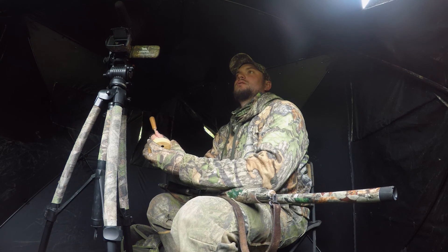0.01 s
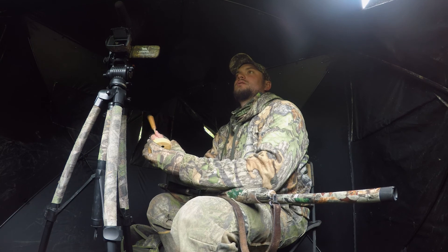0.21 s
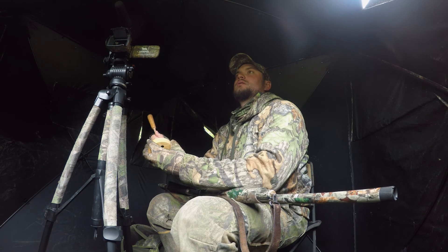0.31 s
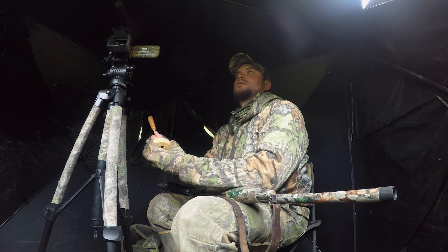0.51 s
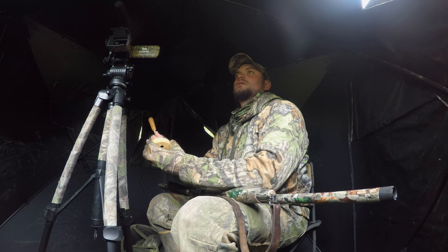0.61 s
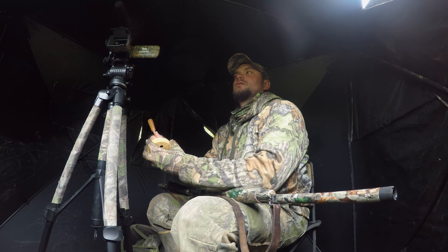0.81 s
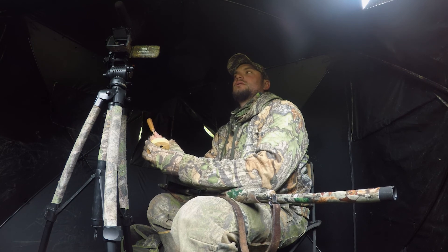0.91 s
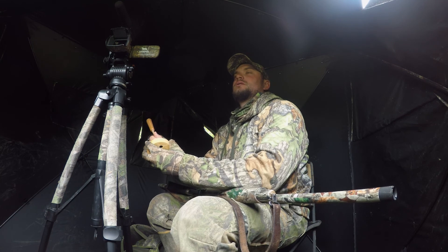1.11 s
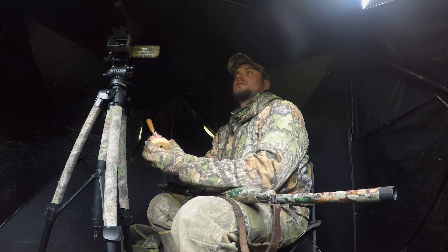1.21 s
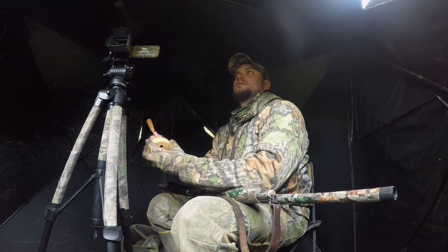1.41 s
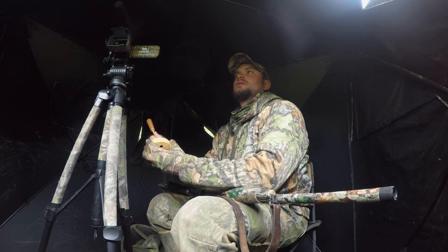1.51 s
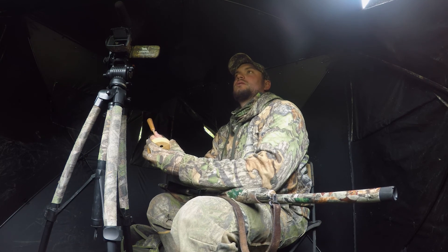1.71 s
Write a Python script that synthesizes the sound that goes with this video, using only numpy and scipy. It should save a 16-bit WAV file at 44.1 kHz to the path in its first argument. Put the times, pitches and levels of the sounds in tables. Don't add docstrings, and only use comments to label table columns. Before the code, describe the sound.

A wooden striker catches on a slate pot call, giving one very short, bright, hollow cluck. Close microphone in a small cloth blind; faint woods echo, soft road rumble, hiss and tiny cloth rustles continue.

```python
import sys
import numpy as np
from scipy import signal
from scipy.fft import rfft, irfft
from scipy.io import wavfile
from scipy.ndimage import uniform_filter1d

SR = 44100
rng = np.random.default_rng(int(sys.argv[2]) if len(sys.argv) > 2 else 0)


def pcm_store(signal):
    levels = np.round(np.clip(np.atleast_2d(signal), -1, 1) * 32767)
    wavfile.write(sys.argv[1], SR, levels.astype(np.int16).T)


def gain_from_decibels(decibels):
    exponent = np.asarray(decibels, float) / 20
    return 10 ** exponent


N = 77175

# f/Hz, level/dB per Hz
AIR_SPECTRUM = [(76, -34), (130, -4.5), (193, -4), (271, -11), (650, -12.5), (793, -14.5), (4200, -35.5),
                (9490, -34), (15000, -46.5)]
# f/Hz, correlation/1
AIR_LIKENESS = [(60, 0.63), (130, 0.4), (290, -0.25), (630, -0.86), (1380, -0.59), (3030, -0.011),
                (6640, 0.32), (14500, -0.26)]
# t/s, level/dB
ROAD_SWELL = [(0, -3), (0.201, -3), (0.451, -4), (0.849, -1.5), (1.501, -1.7), (1.75, -1)]
# t/s, length/s, level/dB, centre f/Hz
CLOTH_RUSTLES = [
    (0, 0.026, -61, 6100),
    (0.315, 0.073, -59.5, 6800),
    (.53, 0.13, -63.5, 7220),
    (0.87, 0.045, -58, 6560),
    (.883, 0.0061, -49, 7350),
    (1.001, 0.021, -61.5, 6700),
    (1.094, 0.037, -65.5, 6960),
]
# t/s, slip rate f/Hz, force level/dB, overtone tilt/dB per octave, swing level/dB
STRIKER_STROKE = [
    (.18, 885, -76, -0.5, -64.5),
    (0.202, 877, -48.5, -5.5, -49.5),
    (.208, 890.2, -17, 0.5, -18),
    (0.2127, 758, -17, 0.5, -21.5),
    (0.2177, 666.7, -12.5, 0, -40.5),
    (.2235, 628.3, -19.5, 1, -36),
    (.238, 877, -24, 3, -28.5),
    (0.247, 987, -26.5, -0.5, -30.5),
    (0.26, 980, -51, -5, -65),
]
# f/Hz, width/Hz, level/dB, left-right level/dB, left lead/rad
POT_MODES = [(1232, 107, 5.5, -1, -1), (1519, 110, 1.5, 6, 1.74), (1751, 81, 0.5, -5.5, -1.2),
             (2230, 186, -7.5, 7.5, -0.5), (2605, 279, 0, -0.5, -1), (3490, 380, -9.5, 4.5, 1.41),
             (4130, 580, -20, 6.5, -1.4), (5151, 200, -6, 2, 1.65), (5977, 485, -19, -2, -11.07),
             (6200, 280, -14, 6, 0.5), (7120, 230, -14, -3, -2), (7556, 370, -20, -5.5, 4),
             (8470, 1200, -26.5, -2, -2.5)]

AIR_DB, SWELL_TOP_HZ = -47, 701
RUSTLE_WIDTH_HZ = 2200
EARLIER_DB = -58
HUM_DB, HUM_HZ, HUM_LIKENESS = -84, 40, .9
TICK_S, TICK_EVERY_S, TICK_WIDE_S, TICK_DB = .1, .1024, .0037, -69
LOWCUT_HZ = 133.8
JITTER_RATIO, CHATTER_DB = .03, .66
GRIT_GAIN, GRIT_DECAY_SLIPS = .381, .79
SWING_PAN_DB, SWING_LEAD_RAD = -1.5, -1.2
BITE_S, BITE_LENGTH_S, BITE_BOOST_DB, BITE_TICK_DB = .2085, .0043, 5.5, -52
POT_BAND_HZ = [1080, 9200]
BLIND_DB, BLIND_T60_S, BLIND_LOW_HZ, BLIND_LIKENESS = -2.5, .1, 1184, .75
BLIND_BOOM_HZ, BLIND_BOOM_DB = 1340, 4.5
TREE_S, TREE_DB, TREE_SPREAD_S, TREE_BRIGHT = .125, -43, .06, .3
BANK_S, BANK_DB, BANK_SPREAD_S, BANK_HZ, BANK_WIDTH_HZ = .142, -46, .018, 1255, 80
WOODS_DB, WOODS_T60_S, WOODS_HZ, WOODS_WIDTH_HZ = -44.5, 2.3, 1290, 330
EARS = np.array([[.5], [-.5]])


def evened(x):
    return x / np.sqrt(np.mean(x ** 2) + 1e-20)


def read(points, hz):
    f, v = np.transpose(points)
    return np.interp(np.log(hz + 1), np.log(f + 1), v)


def ring(x, hz, width_hz):
    r = np.exp(-np.pi * width_hz / SR)
    pole = r * np.exp(2j * np.pi * hz / SR)
    return 2 * signal.lfilter([1 - r], [1, -pole], x + 0j)


def ring_twice(x, hz, width_hz):
    return ring(ring(x, hz, width_hz).real, hz, width_hz).real


def taps(shape):
    n = len(shape) // 16
    out = np.zeros((2, n * 16))
    at = np.arange(n) * 16 + rng.integers(0, 16, (2, n))
    np.put_along_axis(out, at, rng.choice([-1., 1.], at.shape), 1)
    out = out * shape[:n * 16]
    return out / np.linalg.norm(out, axis=1, keepdims=True)


def dull(x, hz, width_hz):
    x = ring_twice(x, hz, width_hz)
    return x / np.linalg.norm(x, axis=1, keepdims=True)


def air():
    frames, hz = N // 256 + 5, np.fft.rfftfreq(1024, 1 / SR)
    a, b, c, d, patches = rng.standard_normal((frames, 513, 5)).T
    patches = uniform_filter1d(patches, size=8, axis=0)
    patches = evened(uniform_filter1d(patches, size=8, axis=1))
    low = 1 / (1 + (hz[:, None] / SWELL_TOP_HZ) ** 2)
    swell_db = np.interp(np.arange(frames) * 256 / SR, *np.transpose(ROAD_SWELL))
    same = np.clip(read(AIR_LIKENESS, hz), -.98, .98)[:, None]
    left = a + 1j * b
    right = same * left + np.sqrt(1 - same ** 2) * (c + 1j * d)
    level_db = read(AIR_SPECTRUM, np.maximum(hz, 140))[:, None]
    level_db = level_db + (.17 + .67 * low) * patches + (.67 + .88 * low) * swell_db
    z = np.array([left, right]) * gain_from_decibels(level_db)
    return gain_from_decibels(AIR_DB) * evened(signal.istft(z, nperseg=1024, noverlap=768)[1][:, :N])


def rustles():
    out, t = np.zeros((2, N)), np.arange(N) / SR
    for s, length_s, db, hz in CLOTH_RUSTLES:
        u = np.clip((t - s) / length_s, 0, 4)
        grains = rng.standard_normal((2, N)) * gain_from_decibels(2.5 * rng.exponential(1, N))
        band = evened(ring_twice(grains, hz, RUSTLE_WIDTH_HZ))
        rise = np.minimum(u / .13, 1)
        fall = np.exp(-np.maximum(u - .3, 0) ** 2 * 2) * (u < 4)
        out += gain_from_decibels(db) * band * rise * fall
    return out


def woods_tail():
    t = np.arange(SR) / SR
    build = np.minimum(t / .028, 1)
    return dull(taps(gain_from_decibels(-60 * t / WOODS_T60_S) * build), WOODS_HZ, WOODS_WIDTH_HZ)


def earlier_call(woods):
    tail = gain_from_decibels(EARLIER_DB) * woods / np.std(woods[:, :4000])
    return np.pad(tail, ((0, 0), (0, N)))[:, 2000:N + 2000]


def camera_hum():
    a = rng.standard_normal((3, N))
    a = HUM_LIKENESS * a[0] + np.sqrt(1 - HUM_LIKENESS ** 2) * a[1:]
    return gain_from_decibels(HUM_DB) * evened(ring(a, HUM_HZ, 50).real)


def camera_ticks():
    u = (np.arange(N) / SR - TICK_S) / TICK_EVERY_S + .5
    sizes = gain_from_decibels(TICK_DB + 1.5 * rng.standard_normal(24))
    size = sizes[np.clip(u.astype(int) + 1, 0, 23)]
    v = (u % 1 - .5) * TICK_EVERY_S / TICK_WIDE_S
    return -size * v * np.exp(.5 - v ** 2 / 2)


def striker_swing(turns, swing_db):
    level = np.sqrt(2) * gain_from_decibels(swing_db + EARS * SWING_PAN_DB)
    return level * np.cos(2 * np.pi * turns + EARS * SWING_LEAD_RAD)


def pot(drive):
    out = np.zeros((2, N))
    for k, (hz, width_hz, db, pan_db, lead_rad) in enumerate(POT_MODES):
        mode = ring(ring(drive, hz, width_hz).real, hz, 3 * width_hz)
        out += (-1) ** k * gain_from_decibels(db + EARS * pan_db) * (mode * np.exp(1j * EARS * lead_rad)).real
    return signal.sosfilt(signal.butter(4, POT_BAND_HZ, "band", fs=SR, output="sos"), out)


def cluck():
    t = np.arange(N) / SR
    s, *controls = np.transpose(STRIKER_STROKE)
    slip_hz, force_db, tilt_db, swing_db = (np.interp(t, s, c) for c in controls)
    wobble = evened(uniform_filter1d(rng.standard_normal(N), size=60))
    chatter = evened(uniform_filter1d(rng.standard_normal(N), size=90))
    turns = np.cumsum(slip_hz * (1 + JITTER_RATIO * wobble)) / SR
    slips = sum(gain_from_decibels(tilt_db * np.log2(k)) * np.cos(2 * np.pi * k * turns) for k in range(2, 16))
    grit = evened(np.exp(-(turns % 1) / GRIT_DECAY_SLIPS) * rng.standard_normal(N))
    bite = np.exp(-np.maximum(t - BITE_S, 0) / BITE_LENGTH_S) * (t > BITE_S)
    touching = (t > s[0]) * (t < s[-1])
    force = gain_from_decibels(force_db + CHATTER_DB * chatter + BITE_BOOST_DB * bite) * touching
    drive = force * (slips + 3 * GRIT_GAIN * grit * gain_from_decibels(2 * tilt_db))
    tick = gain_from_decibels(BITE_TICK_DB) * bite * np.diff(grit, n=2, prepend=[0, 0])
    return striker_swing(turns, swing_db) * touching + tick + pot(drive)


def blind_walls():
    t = np.arange(SR) / SR
    walls = gain_from_decibels(BLIND_DB) * taps(gain_from_decibels(-60 * t / BLIND_T60_S) * (t > .002))
    walls = signal.sosfilt(signal.butter(4, BLIND_LOW_HZ, "high", fs=SR, output="sos"), walls)
    apart = walls - walls.mean(0)
    boom = gain_from_decibels(BLIND_BOOM_DB) * ring(apart, BLIND_BOOM_HZ, 400).real
    return walls - BLIND_LIKENESS * apart + boom


def tree_line():
    t = np.arange(SR) / SR
    slap = taps(np.exp(-((t - TREE_S) / TREE_SPREAD_S * 2) ** 2))
    return signal.lfilter([1, -TREE_BRIGHT], [1], gain_from_decibels(TREE_DB) * slap)


def far_bank():
    t = np.arange(SR) / SR
    slap = taps(np.exp(-((t - BANK_S) / BANK_SPREAD_S * 2) ** 2))
    return gain_from_decibels(BANK_DB) * dull(slap, BANK_HZ, BANK_WIDTH_HZ)


def spaces(x, woods):
    echoes = blind_walls() + tree_line() + far_bank() + gain_from_decibels(WOODS_DB) * woods
    return x + signal.fftconvolve(x, echoes, axes=1)[:, :N]


def scene():
    woods = woods_tail()
    return air() + rustles() + earlier_call(woods) + spaces(cluck(), woods)


def band_limit(x):
    return signal.sosfilt(signal.butter(12, 15140, fs=SR, output="sos"), x)


def record(dry):
    hz = np.fft.rfftfreq(N, 1 / SR)
    gain = 1 / (1 + (LOWCUT_HZ / (hz + 1)) ** 24)
    mix = irfft(rfft(dry, axis=1) * gain, N, axis=1)
    mix = mix + camera_hum() + camera_ticks()
    return band_limit(mix)


dry = scene()
out = record(dry)
pcm_store(out)
```